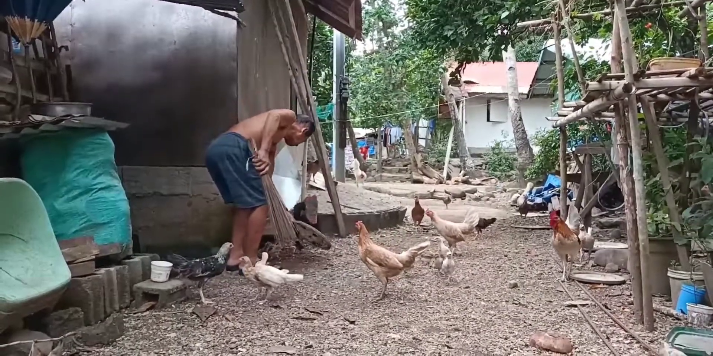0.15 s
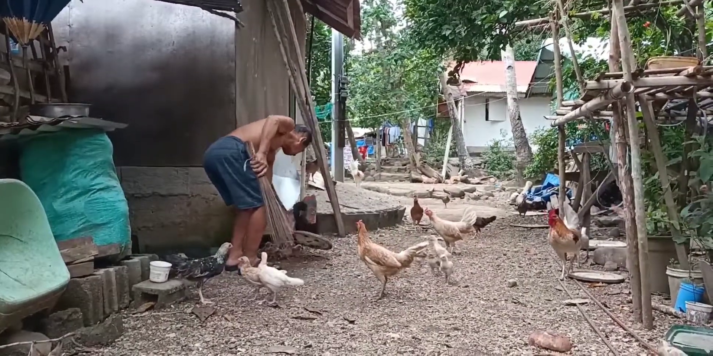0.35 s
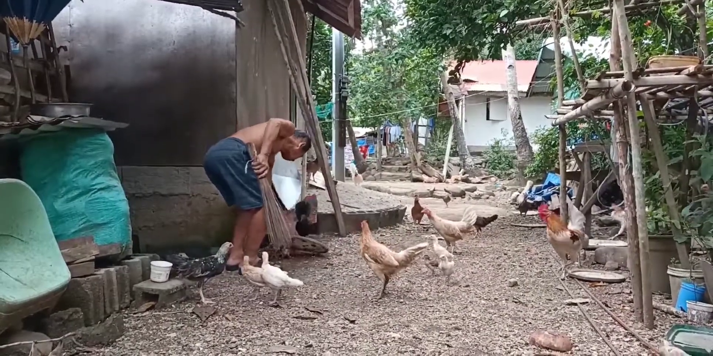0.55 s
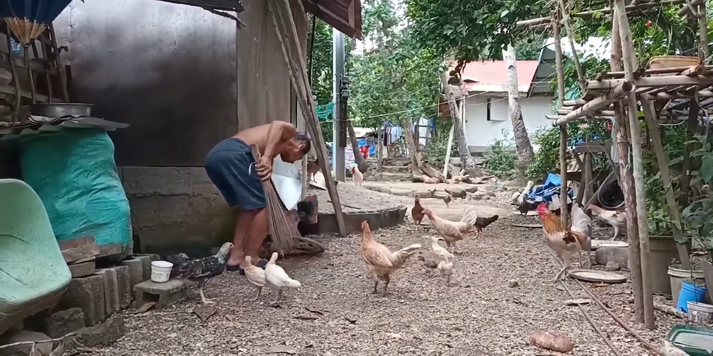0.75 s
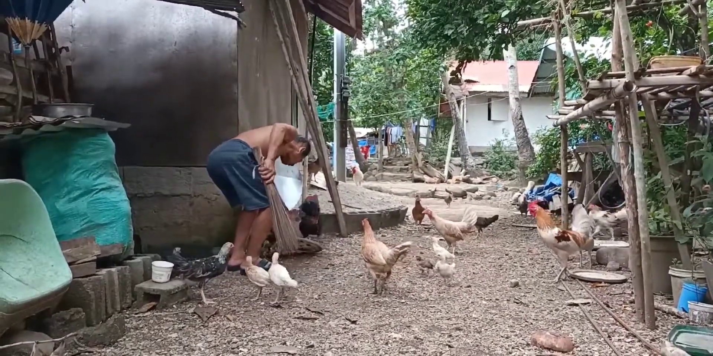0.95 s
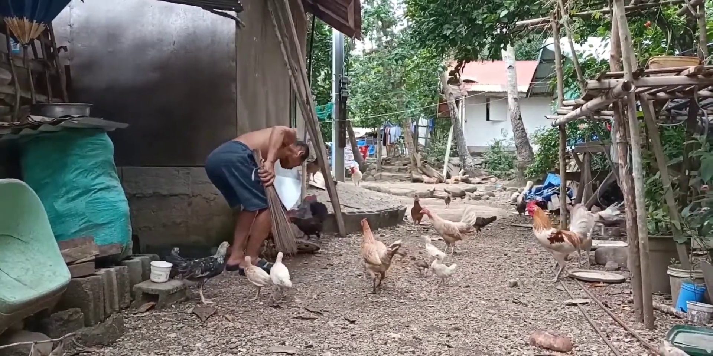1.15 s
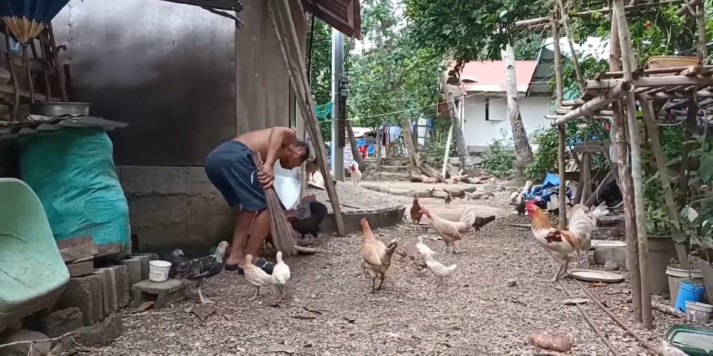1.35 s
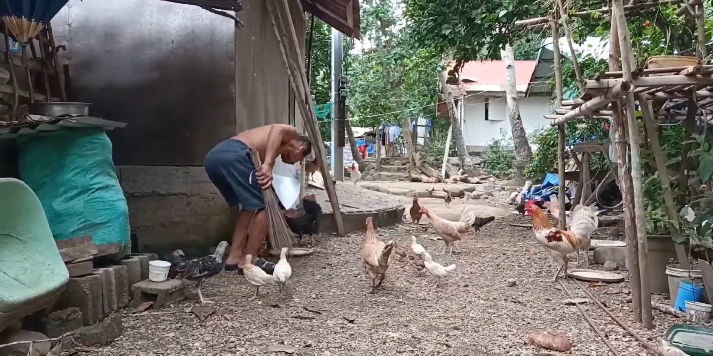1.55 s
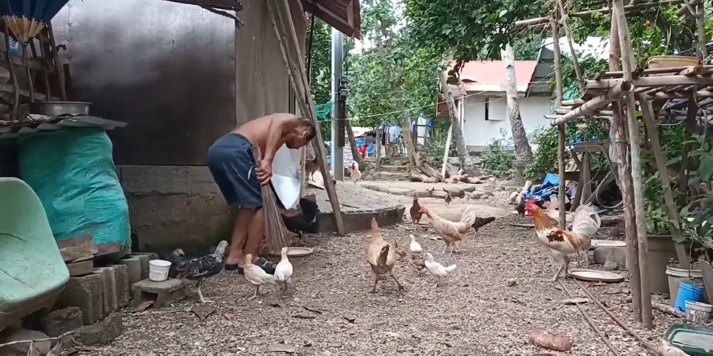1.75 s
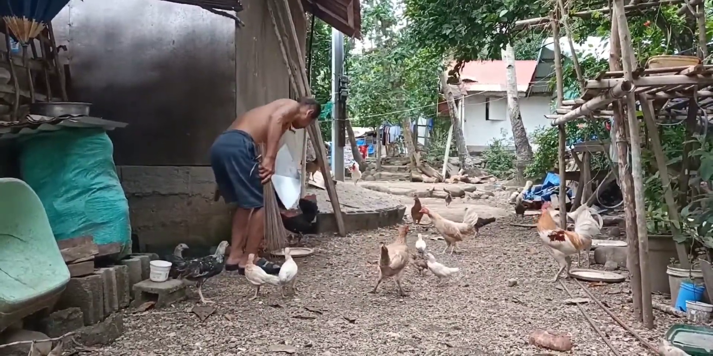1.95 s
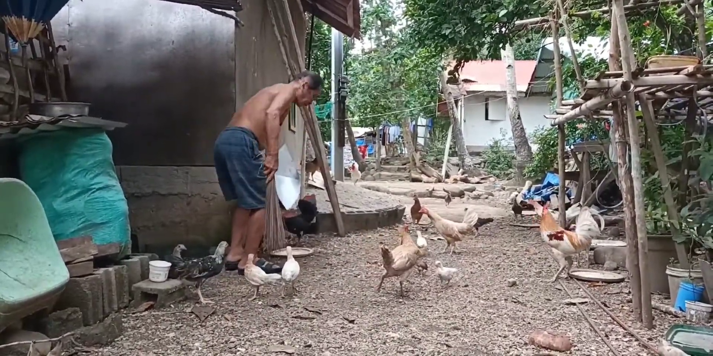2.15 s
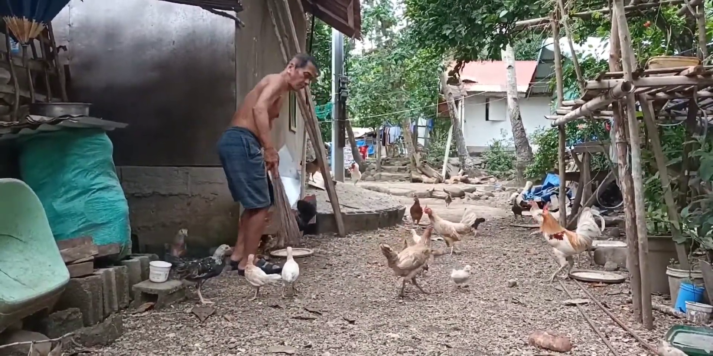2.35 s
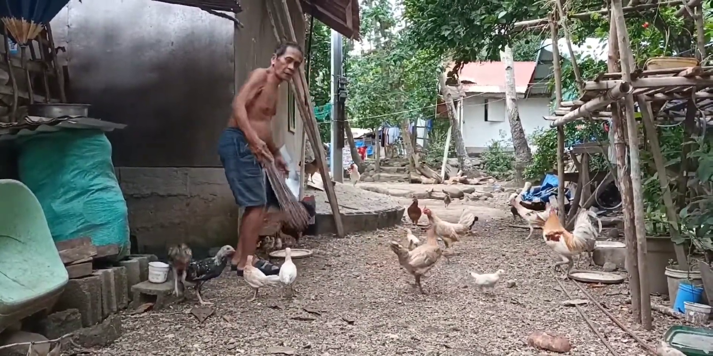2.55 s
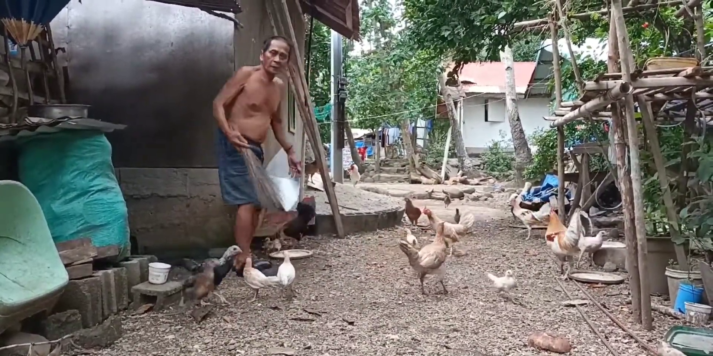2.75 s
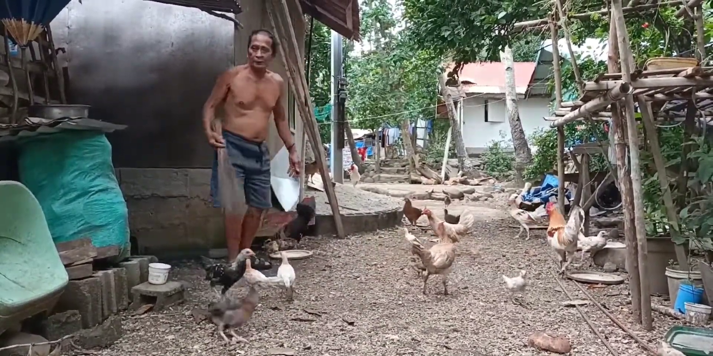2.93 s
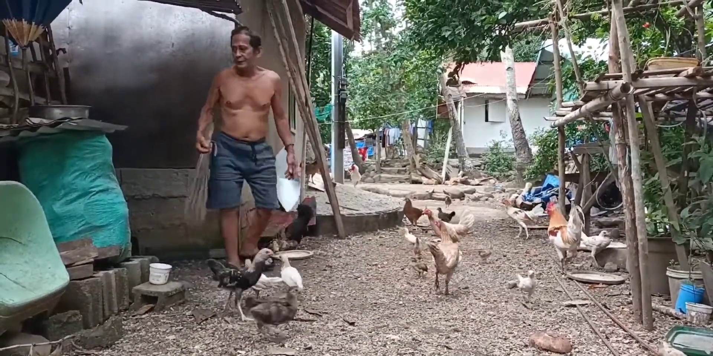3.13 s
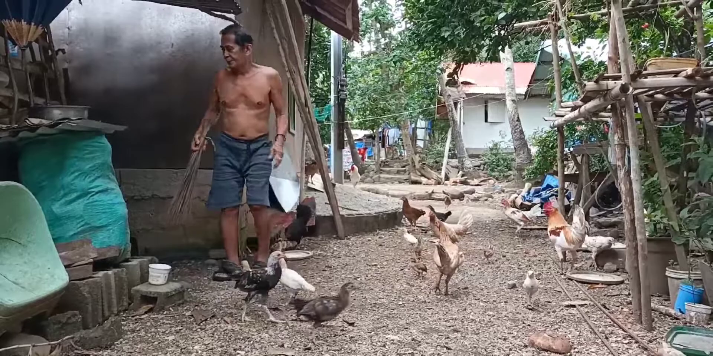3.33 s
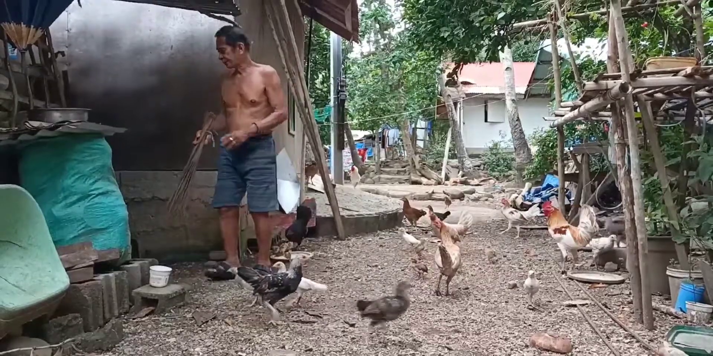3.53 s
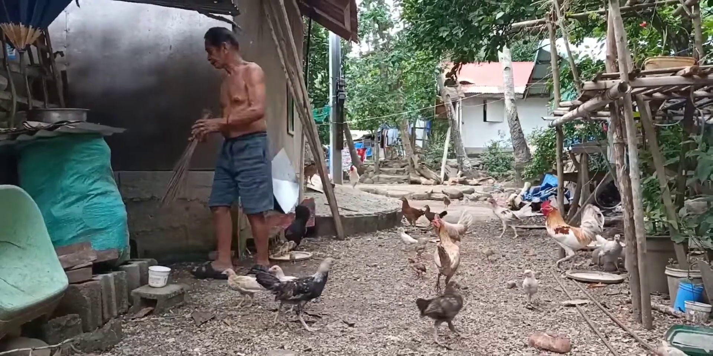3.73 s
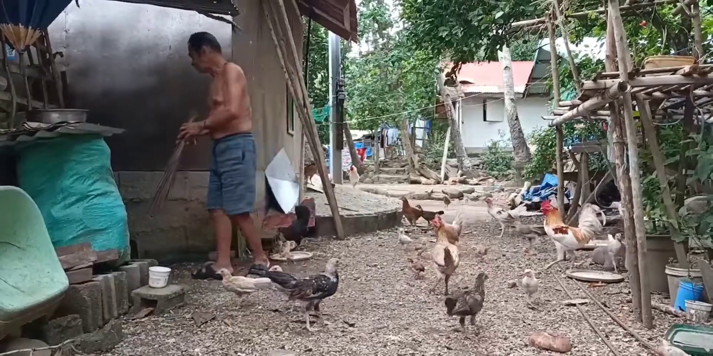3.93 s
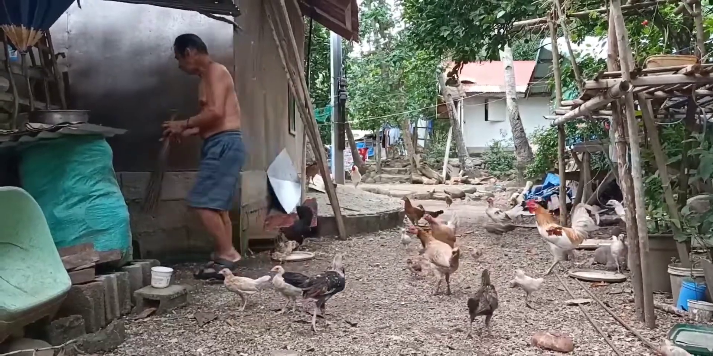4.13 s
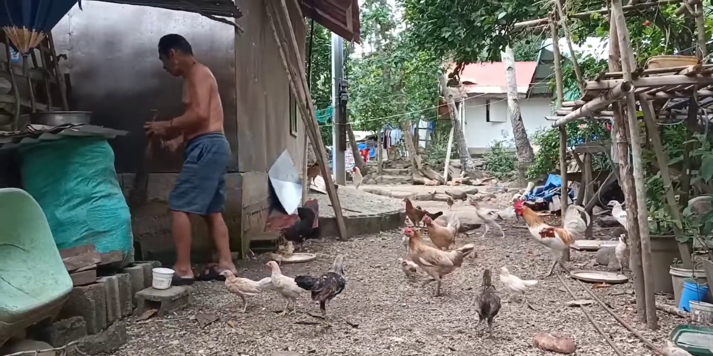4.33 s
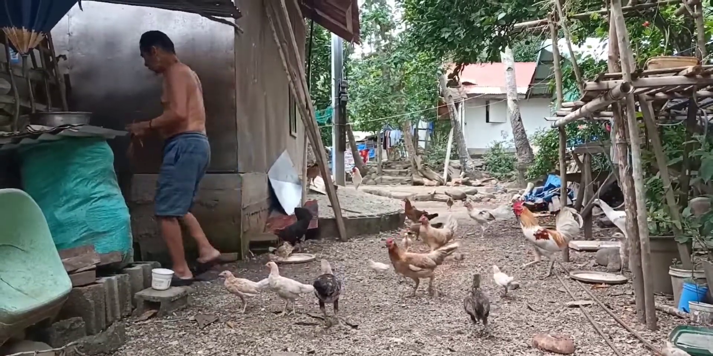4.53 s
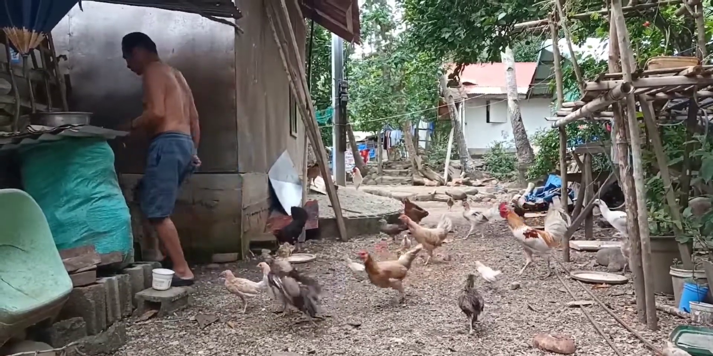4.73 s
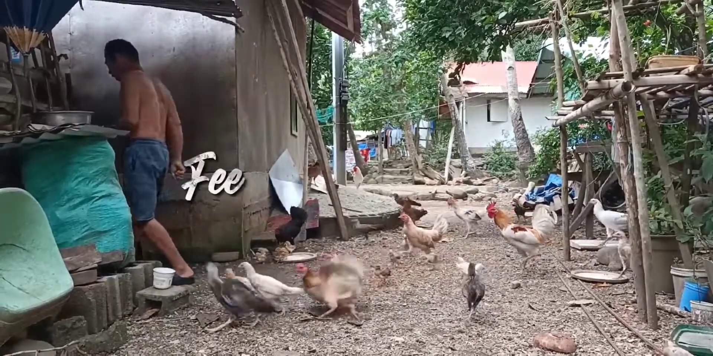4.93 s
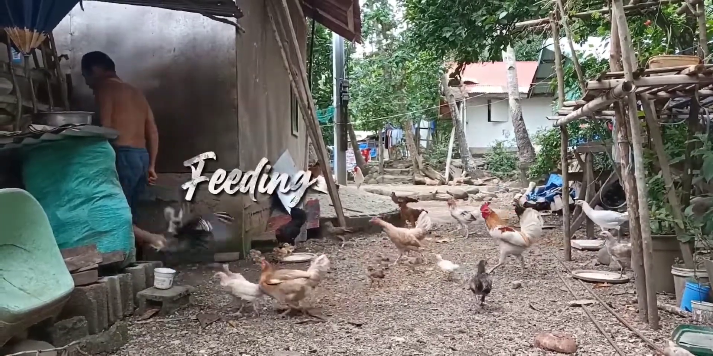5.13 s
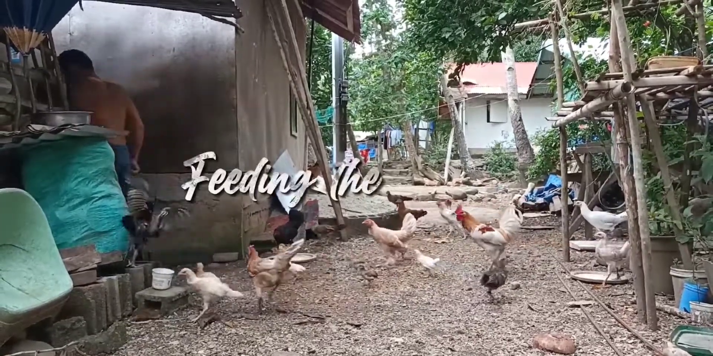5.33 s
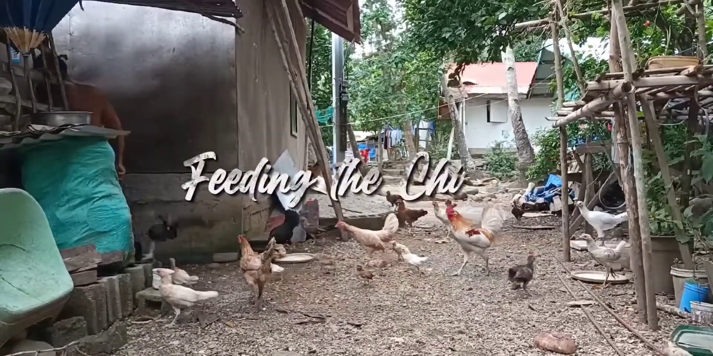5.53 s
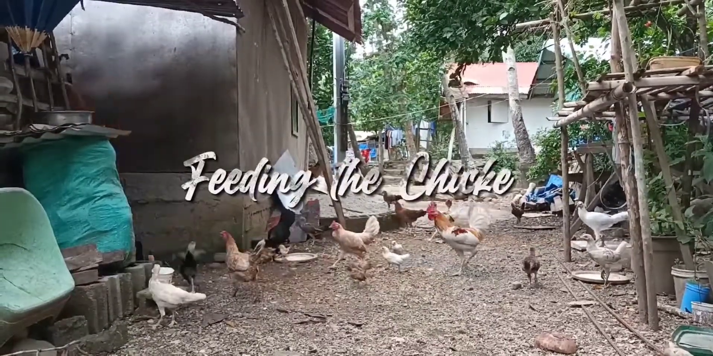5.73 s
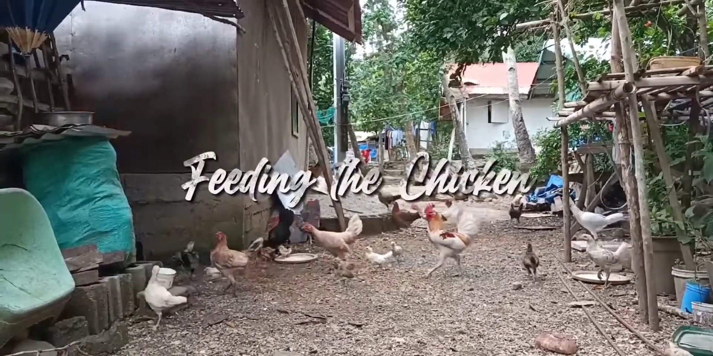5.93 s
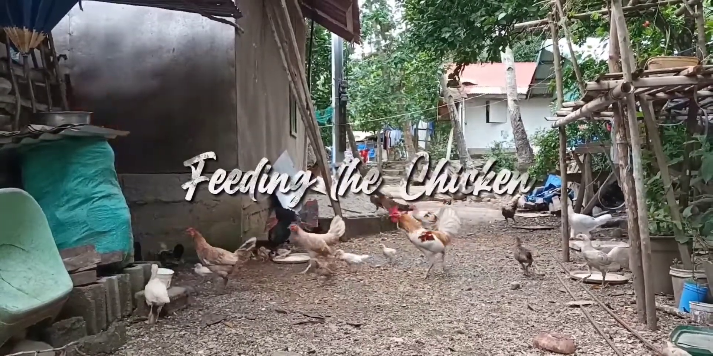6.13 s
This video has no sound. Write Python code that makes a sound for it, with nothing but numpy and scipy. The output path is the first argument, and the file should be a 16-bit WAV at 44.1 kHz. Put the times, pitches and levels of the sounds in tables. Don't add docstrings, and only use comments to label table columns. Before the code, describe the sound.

An outdoor poultry yard heard in stereo: bright chick cheeps scattered all around, short low clucks from several hens, faint high insect notes and a steady distant motor hum. A few soft coos come midway. After about four and a half seconds, loud irregular wing flaps burst out close by, popping and snapping through the continuing peeps, then stop, leaving clucks and cheeps with a short wall echo.

```python
import sys
import numpy as np
from scipy import signal
from scipy.io import wavfile
from scipy.ndimage import uniform_filter1d

SR = 44100
rng = np.random.default_rng(int(sys.argv[2]) if len(sys.argv) > 2 else 0)


def to_wav(sig):
    pcm = np.clip(np.atleast_2d(sig), -1, 1) * 32767
    pcm = np.round(pcm).astype(np.int16)
    wavfile.write(sys.argv[1], SR, pcm.T)


def level_to_linear(level):
    exponent = np.asarray(level, float) / 20
    return 10 ** exponent


N = 272538

# left minus right in dB, lag of the left in samples.
PLACES = [
    (4, 3),
    (-1.5, -2),
    (-11, -7),
    (10, 6.5),
]
# delay in seconds, level in dB.
WALLS = [(.016, -9), (.031, -9), (.052, -11)]
# frequency in Hz, time to fall 60 dB in seconds.
YARD_DECAY = [(300, 0.015), (1500, 0.2), (4000, 0.39), (10000, 0.17)]

# frequency in Hz, level in dB per Hz.
AIR_COLOUR = [(15, -42), (30, -28), (50, -8), (113, -3), (140, -10), (216, -17), (500, -23), (1820, -30),
              (2440, -25), (2900, -22), (5060, -29), (7600, -24), (8000, -46), (14500, -42), (15700, -53)]
# frequency in Hz, likeness from 0 to 1.
LIKENESS = [(60, 1), (380, 0.57), (2380, 0.053), (15000, 0.5)]
AIR_DB, PATCHY_DB = -56, 2.8
# frequency in Hz, waver width in Hz, level in dB.
HUM_LINES = [(64.6, 18, -66.5), (93.8, 3.8, -58), (117.2, 0.98, -52.5), (140.7, 6.1, -61)]
# time in seconds, level in dB.
HUM_LOAD = [(0.0, -50), (6.18, -47)]
HUM_WAVER = .25

# start in seconds, length in seconds, start pitch in Hz, end pitch in Hz, level in dB.
HELD_LEFT = [(0.143, 0.05, 4450, 3750, -43), (0.34, 0.105, 5050, 4400, -44), (2.25, 0.035, 5650, 4360, -48),
             (2.898, 0.074, 4600, 4050, -51), (3.487, 0.026, 3450, 2900, -38)]
HELD_RIGHT = [(0.083, 0.017, 3240, 2870, -43.5), (0.604, 0.029, 3340, 2940, -40.5),
              (1.422, 0.092, 4220, 3450, -43.5), (2.072, 0.065, 4080, 3250, -45),
              (3.515, 0.055, 4500, 3200, -43), (3.545, 0.09, 4050, 2950, -38),
              (3.802, 0.061, 4190, 3860, -49), (3.982, 0.046, 3540, 2550, -50),
              (4.578, 0.15, 4170, 3950, -41), (5.04, 0.053, 3550, 3060, -41.5),
              (5.428, 0.024, 4870, 2700, -53), (5.509, 0.034, 3650, 2940, -37.5),
              (5.863, 0.12, 4280, 3690, -50.5)]
# start and length in seconds, two pitches in Hz, dB.
SLIDES_LEFT = [(0.762, 0.025, 4300, 3300, -51), (2.915, 0.07, 6400, 4300, -52),
               (2.511, 0.094, 6600, 4800, -54), (3.421, 0.12, 5950, 5070, -58.5),
               (4.15, 0.07, 5800, 5240, -53.5), (4.391, 0.13, 3690, 3096, -49),
               (4.434, 0.042, 3100, 2190, -49.5)]
SLIDES_AHEAD = [(0.001, 0.077, 4480, 3504, -46), (0.39, 0.088, 4400, 3170, -38),
                (0.323, 0.028, 4200, 2450, -51), (1.03, 0.052, 4040, 3700, -56),
                (1.859, 0.032, 4700, 2700, -54), (1.893, 0.046, 3850, 3640, -48),
                (2.16, 0.028, 4300, 3850, -42), (2.284, 0.047, 4440, 3633, -38.5),
                (2.331, 0.024, 3900, 2890, -46), (2.699, 0.032, 3800, 3080, -39.5),
                (2.981, 0.05, 4300, 3260, -43.5), (3.019, 0.034, 3340, 2610, -42.5),
                (3.19, 0.048, 3744, 3083, -44.5), (3.298, 0.042, 3610, 2280, -52),
                (3.873, 0.045, 3460, 2535, -43), (4.632, 0.035, 3550, 3050, -43),
                (5.405, 0.045, 3640, 3000, -46), (5.582, 0.06, 4020, 3500, -37),
                (5.773, 0.078, 5390, 4160, -47.5), (6.091, 0.045, 5780, 4310, -48),
                (6.153, 0.021, 4350, 3950, -45)]
SLIDES_RIGHT = [(0.544, 0.056, 4290, 3185, -43.5), (1.515, 0.048, 3900, 3420, -46),
                (2.0, 0.065, 5600, 4300, -55), (1.7, 0.039, 3535, 3060, -44.5),
                (2.535, 0.093, 4290, 3840, -52), (2.603, 0.058, 4800, 3200, -43),
                (2.657, 0.027, 3000, 2290, -45.5), (2.86, 0.034, 3870, 3436, -36),
                (4.258, 0.082, 4314, 3197, -43), (4.045, 0.11, 4335, 3400, -42.5),
                (4.21, 0.05, 2800, 2240, -53), (5.154, 0.089, 4570, 3175, -39.5),
                (5.564, 0.1, 4520, 4160, -49)]
# start and length in seconds, two pitches in Hz, dB.
HOOKS = [(0.7, 0.03, 4300, 2900, -45), (1.196, 0.05, 4400, 2950, -44), (1.36, 0.03, 4300, 2950, -51),
         (2.155, 0.049, 4000, 2850, -40.5), (2.61, 0.04, 4200, 2600, -53), (2.65, 0.04, 4500, 3500, -50),
         (2.72, 0.04, 4100, 3700, -47), (3.11, 0.05, 3700, 2900, -50), (3.2, 0.059, 4000, 2950, -43),
         (3.49, 0.04, 4000, 2700, -48), (3.63, 0.05, 4500, 3700, -49), (3.665, 0.06, 4000, 2900, -42),
         (5.822, 0.07, 4300, 2880, -41), (5.955, 0.042, 4300, 2900, -43)]
# start and length in seconds, start and end pitch in Hz, level in dB.
FAINT = [(0.02, 0.045, 8800, 7340, -56), (0.149, 0.038, 3900, 2540, -58), (2.33, 0.023, 4300, 3420, -50),
         (2.4, 0.05, 4200, 3470, -51.5), (4.975, 0.065, 4700, 4000, -50), (0.266, 0.072, 4360, 4130, -60),
         (0.375, 0.027, 4070, 3270, -54), (0.41, 0.025, 3840, 2800, -51), (0.455, 0.095, 4550, 4300, -55),
         (0.61, 0.089, 6680, 6450, -53), (0.85, 0.03, 4000, 3490, -57), (0.875, 0.033, 3230, 2590, -53),
         (0.945, 0.028, 3950, 3400, -55), (0.968, 0.03, 3200, 2730, -57), (1.075, 0.061, 4800, 4650, -60),
         (1.09, 0.045, 3800, 3900, -54), (1.985, 0.025, 3130, 2460, -64), (2.091, 0.062, 3000, 2380, -58),
         (2.62, 0.04, 3000, 2200, -57.5), (2.67, 0.08, 4870, 4420, -54), (2.94, 0.044, 3700, 3070, -47.5),
         (3.1, 0.091, 4340, 4040, -49), (3.369, 0.056, 3320, 2770, -55), (3.501, 0.068, 4610, 3860, -46),
         (3.545, 0.023, 3480, 3130, -43), (3.601, 0.078, 4850, 4110, -48.5), (3.645, 0.18, 5300, 4570, -58),
         (3.905, 0.1, 6450, 6530, -51), (4.179, 0.044, 4450, 3610, -44), (4.47, 0.11, 6750, 5830, -54),
         (4.49, 0.055, 3405, 2600, -49), (4.53, 0.063, 4970, 4300, -56), (5.409, 0.052, 4200, 2026, -47.5),
         (5.471, 0.085, 4680, 3700, -55.5), (5.915, 0.051, 8460, 6400, -55.5),
         (5.84, 0.02, 7060, 6250, -48),
         (0.305, 0.05, 6250, 6100, -52), (0.36, 0.06, 6700, 6300, -53), (0.43, 0.065, 7400, 5400, -50),
        (0.51, 0.09, 6100, 6050, -56), (0.47, 0.08, 4650, 4400, -55), (4.03, 0.12, 4900, 4800, -56),
        (4.18, 0.13, 4800, 5200, -55), (4.075, 0.07, 8200, 7000, -54), (0.465, 0.05, 3250, 2800, -45),
        (0.97, 0.03, 7000, 5500, -57), (2.638, 0.025, 7300, 6700, -53), (2.75, 0.02, 7200, 6800, -54),
        (3.82, 0.05, 4000, 2650, -53), (3.74, 0.07, 4600, 4500, -54), (3.455, 0.04, 4300, 3900, -51),
        (2.66, 0.035, 4400, 3600, -51), (3.845, 0.02, 7400, 6700, -52), (1.635, 0.03, 4300, 3200, -56)]
# start in seconds, start pitch in Hz, level in dB.
CHEEPS = [(0.098, 6650, -53), (0.426, 7030, -52), (0.619, 6400, -48), (0.84, 6480, -60),
          (1.42, 6170, -57.5), (1.605, 6650, -54.5), (1.81, 6430, -56), (2.879, 6520, -47.5),
          (3.499, 6900, -45), (3.871, 6840, -52), (4.098, 7600, -58), (4.399, 7260, -46.5),
          (4.462, 6800, -50.5), (4.744, 6360, -53), (5.646, 7600, -67), (6.002, 6730, -46)]
CHEEP_S, CHEEP_FALL = 0.061, 0.0875
# start in seconds, length in seconds, start pitch in Hz, level in dB, swell into the plunge in dB.
LONG_CALLS = [(0.651, 0.069, 5120, -61, 23), (1.161, 0.16, 5370, -52.5, 18),
              (1.598, 0.12, 5120, -60.5, 19.5), (2.048, 0.14, 5230, -50.5, 8),
              (2.746, 0.16, 5510, -52, 15.5), (3.06, 0.19, 4940, -54, -3), (3.418, 0.22, 4920, -55, 19),
              (3.757, 0.15, 5575, -49.5, 16), (4.345, 0.16, 5300, -47, 9)]
SAG, PLUNGE = .13, .29
KNEE, KNEE_WIDTH = .74, 0.0923
HELD_BEND, SLIDE_BEND, HOOK_BEND = 1.6, 0.94, .5
OVERTONES_DB = [-26, -37]
SHRILL_HZ, SHRILL_WIDTH_HZ, SHRILL_DB = 5050, 450, 13
KNOT_HZ, KNOT_WIDTH_HZ, KNOT_DB = 3460, 69, 5
GRAIN, WOBBLE = .7, .006
HIGH_SHARE, HIGH_HZ, HIGH_DB = .35, 2300, -14
NEAR_DB, ECHO_DB = 5.5, -3.5
CROWD_DB, CROWD_ECHO_DB = 4.0, -5.0

CRICKET_STARTS = [0.511, 1.28, 2.04, 2.796, 3.56, 4.32, 5.09, 5.965]
CRICKET_HZ, CRICKET_LENGTH_S, CRICKET_DB = 7710, 0.02, -46.5

# time in seconds, peak in dB, hollow ring in Hz, feather snap in relative dB.
CLAPS = [(4.723, -17.5, 2070, 3), (4.7315, -12.5, 2240, -14), (4.7513, -19, 2030, -8),
         (4.8109, -21, 2100, -20), (4.816, -20, 1920, -0.5), (4.8772, -19.5, 2270, -8),
         (4.883, -26, 2130, 6.5), (4.8897, -18, 1950, -11), (4.911, -27, 1920, -19),
         (4.9248, -25, 1680, -5), (4.9626, -16, 1980, -7), (4.9704, -12, 2120, -6.5),
         (4.992, -18.5, 2550, -6), (5.041, -30, 2400, -9), (5.0562, -17.5, 2200, -12),
         (5.1056, -29, 2290, 2), (5.1168, -13.5, 2190, -18), (5.2015, -26.5, 2240, 5),
         (5.2051, -17.5, 2230, -0.5), (5.227, -20.5, 2460, 4), (5.238, -14, 2140, -6.5),
         (5.252, -45, 2300, -3), (5.264, -38.5, 2300, 10), (5.3171, -27, 2010, 0), (5.321, -18, 1920, -5),
         (5.36, -29, 2060, -5), (5.368, -31, 2400, -8), (5.387, -22, 1440, -26), (5.467, -25.5, 2050, -6),
         (5.6255, -18.5, 1740, 2), (5.631, -12.5, 1570, -17), (5.714, -23.5, 2100, 3),
         (5.719, -22.5, 2150, -1), (5.751, -20, 1960, 3), (5.7544, -12, 2150, -4.5)]
# time in seconds, peak in dB, ring in Hz, snap in relative dB.
PECKS = [
    (0.247, -58, 2340, 2.3),
    (3.455, -42, 2300, -12),
    (3.464, -44, 1500, -12),
    (6.152, -40, 2240, 8),
]
LEAD_S, LEAD_POP = .014, .3
SNAP_SPREAD = .55

# frequency in Hz, width in Hz, level in dB.
FAR_THROATS = [
    [(800, 150, -8), (1230, 140, 0), (1980, 110, 3)],
    [(1425, 110, 0), (1750, 150, -2), (2010, 130, -3)],
    [(1866, 60, -7), (2130, 150, 1.5)],
]
# time in seconds, level in dB.
FAR_CALLS = [
    [(0.5, -62.5), (0.66, -47), (0.8, -81)],
    [(1.26, -58), (1.33, -53), (1.36, -61), (1.39, -51), (1.42, -63), (1.455, -61), (1.478, -47),
     (1.52, -58), (1.58, -68)],
    [(1.64, -50.5), (1.736, -60), (1.8, -78)],
]
# start in seconds, peak in dB, length in seconds.
DEEP_HEN = [(0.694, -45.5, 0.019), (1.101, -44.5, 0.041), (2.166, -39.5, 0.032), (2.21, -36.5, 0.026),
            (2.969, -37, 0.028), (3.021, -37, 0.018), (3.18, -50.5, 0.045), (4.064, -40.5, 0.036),
            (4.238, -44.5, 0.012), (4.535, -40, 0.03), (4.578, -39, 0.025), (5.016, -37.5, 0.01),
            (5.202, -30, 0.01), (5.712, -29, 0.016), (5.92, -46, 0.023), (6.055, -38.5, 0.015),
            (6.099, -41, 0.016)]
MIDDLE_HEN = [(0.649, -44, 0.022), (2.406, -45.5, 0.033), (2.449, -40.5, 0.013), (2.5, -54, 0.03),
              (2.57, -55.5, 0.016), (2.692, -49, 0.021), (4.278, -39, 0.016), (4.372, -42, 0.013),
              (4.496, -48, 0.035), (4.67, -47.5, 0.097), (4.88, -29, 0.027), (5.47, -33.5, 0.018),
              (5.588, -38, 0.011), (5.666, -39.5, 0.022), (5.805, -36, 0.019), (5.999, -41.5, 0.045)]
BRIGHT_HEN = [(0.517, -46, 0.017), (0.845, -37.5, 0.045), (1.423, -38.5, 0.037), (1.628, -44, 0.023),
              (1.641, -39.5, 0.024), (1.662, -42, 0.023), (1.703, -43.5, 0.012), (1.722, -48, 0.012),
              (1.741, -42, 0.0094), (1.757, -43, 0.015), (4.112, -39, 0.027), (5.514, -36.5, 0.037),
              (5.848, -37, 0.021), (6.138, -41, 0.037)]
HEN_HZ = [555, 820, 1110]
# frequency in Hz, width in Hz, level in dB.
THROAT = [(545, 51, 9.5), (899, 172, 19), (1096, 44, 10)]
# start and length in seconds, start and end pitch
# in Hz, level in dB.
MURMURS = [(2.508, 0.025, 930, 850, -58), (2.685, 0.03, 960, 820, -54), (4.49, 0.04, 1000, 800, -52),
           (4.67, 0.04, 720, 800, -55)]
# start in seconds, length in seconds, pitch in Hz, level in dB.
COOS = [
    (3.08, 0.1, 338, -61.5),
    (3.251, 0.11, 376, -58.5),
    (3.403, 0.078, 376, -51),
    (3.551, 0.049, 377, -51),
]
COO_PARTIALS_DB = [6, 0.5, 6.5, -4]

# time in seconds, level in dB.
RUSTLE = [
    [(2.9, -102), (3.0, -68.5), (3.1, -83), (3.18, -76.5), (3.24, -85), (3.28, -93)],
    [(4.72, -65), (4.78, -73.5), (4.86, -94), (4.95, -72), (5.02, -66), (5.07, -58), (5.13, -68.5),
     (5.26, -76), (5.3, -83)],
    [(5.3, -76), (5.38, -73), (5.5, -72.5), (5.6, -88), (5.65, -71), (5.7, -72.5), (5.77, -64), (5.8, -87)],
    [(6.1, -74.5), (6.18, -71)],
]
# frequency in Hz, level in dB per Hz.
RUSTLE_COLOUR = [(180, -31), (300, -16), (1570, -15.5), (2050, -10), (5260, -9), (7500, -10.5),
                 (8300, -22.5), (12000, -26.5), (14500, -25), (15700, -24)]
RUSTLE_GRAIN_DB = 2.0


def evened(x):
    return x / np.sqrt(np.mean(x ** 2) + 1e-20)


def read(points, hz):
    f, value = np.transpose(points)
    return np.interp(np.log(hz + 1), np.log(f + 1), value)


def add(mix, s, sound):
    part = mix[max(round(s * SR), 0):][:len(sound)]
    part += sound[:len(part)]


def resonate(x, hz, width):
    b, a = signal.iirpeak(hz, hz / (1.71 * width), SR)
    return signal.lfilter(b, a, signal.lfilter(b, a, x))


def placed(x, pan_db, lag):
    return np.array([np.roll(x, round(lag)), x]) * level_to_linear([[pan_db / 2], [-pan_db / 2]])


def yard(x):
    taps = np.zeros((2, SR // 2))
    slots = np.arange(700, SR // 2 - 20, 20)
    at = slots + rng.integers(0, 20, (2, len(slots)))
    np.put_along_axis(taps, at, rng.choice([-1., 1.], at.shape), axis=1)
    hz, t, z = signal.stft(taps, SR, nperseg=256)
    decay = level_to_linear(-60 * t / read(YARD_DECAY, hz)[:, None])
    tail = signal.istft(z * decay, SR, nperseg=256)[1]
    tail /= np.linalg.norm(tail[0])
    for delay, db in WALLS:
        arrivals = np.round(delay * SR * rng.uniform(.8, 1.2, 2)).astype(int)
        tail[[0, 1], arrivals] += level_to_linear(db)
    return signal.fftconvolve(x[None], tail, axes=1)[:, :N]


def diffuse_noise(colour):
    hz = np.fft.rfftfreq(1024, 1 / SR)
    a, b, c, d, patches = rng.standard_normal((5, 513, N // 256 + 5))
    patches = uniform_filter1d(patches, size=12, axis=0)
    patches = evened(uniform_filter1d(patches, size=10, axis=1))
    same = np.clip(read(LIKENESS, hz), -1, 1)[:, None]
    left = a + 1j * b
    right = same * left + np.sqrt(1 - same ** 2) * (c + 1j * d)
    gain = level_to_linear(read(colour, hz))
    z = np.array([left, right]) * gain[:, None] * level_to_linear(PATCHY_DB * patches)
    sound = evened(signal.istft(z, nperseg=1024, noverlap=768)[1][:, :N])
    return sound * np.linalg.norm(gain) / np.linalg.norm(gain[5:])


def open_air():
    return level_to_linear(AIR_DB) * diffuse_noise(AIR_COLOUR)


def hum():
    t = np.arange(N) / SR
    lines = np.zeros(N)
    for hz, width, db in HUM_LINES:
        waver = evened(resonate(rng.standard_normal(N), hz, width))
        lines += level_to_linear(db) * evened(np.sin(2 * np.pi * hz * t) + HUM_WAVER * waver)
    s, db = np.transpose(HUM_LOAD)
    return placed(lines * level_to_linear(np.interp(t, s, db) - db.mean()), -1.5, -9)


def peep(length, start_hz, end_hz, bend, db, plunge=0, swell_db=0, overtone_db=0):
    u = np.linspace(0, 1, round(length * SR))
    rates, phases = rng.random((2, 2, 4, 1))
    flutter = np.sin(2 * np.pi * ((30 + 200 * rates) * u * length + phases))
    grain, wobble = flutter.sum(axis=1) / 2
    knee = (1 + np.tanh((u - KNEE) / KNEE_WIDTH)) / 2
    hz = start_hz + (end_hz - start_hz) * u ** bend - plunge * start_hz * knee
    hz = hz * (1 + WOBBLE * wobble)
    turns = 2 * np.pi * np.cumsum(hz) / SR
    shrill_db = overtone_db + SHRILL_DB * np.exp(-((hz - SHRILL_HZ) / SHRILL_WIDTH_HZ) ** 2)
    tone = np.sin(turns)
    for k, partial_db in enumerate(OVERTONES_DB, 2):
        tone += level_to_linear(partial_db + shrill_db) * np.sin(k * turns) * (k * hz < SR / 2)
    knot_db = KNOT_DB * np.exp(-((hz - KNOT_HZ) / KNOT_WIDTH_HZ) ** 2)
    level = level_to_linear(db + swell_db * knee + knot_db)
    return level * tone * (1 + GRAIN * grain) * np.sin(np.pi * u ** 1.05) ** .5


def chicks(held, slides, hooks=()):
    out = np.zeros(N)
    for table, bend in [(held, HELD_BEND), (slides, SLIDE_BEND), (hooks, HOOK_BEND)]:
        for s, length, start_hz, end_hz, db in table:
            add(out, s, peep(length, start_hz, end_hz, bend, db))
    return out


def far_chicks(count=300):
    out = np.zeros(N)
    for when, pitch, fall, size, small in rng.random((count, 5)):
        high = small < HIGH_SHARE
        top = 3400 + 1400 * pitch + HIGH_HZ * high
        end = top * (1 - (.14 + .2 * fall) / (1 + high))
        db = -58 + 8 * size + HIGH_DB * high
        add(out, when * N / SR, peep(.02 + .03 * size, top, end, .8 + 2.2 * size, db, overtone_db=-6))
    return out


def insects(count=50):
    out = np.zeros(N)
    for when, pitch, size in rng.random((count, 3)):
        hz = 7330 + 170 * pitch
        add(out, when * N / SR, peep(0.066 + 0.11 * size, hz, hz - 120, 0.41, -60 + 3 * size))
    for s in CRICKET_STARTS:
        add(out, s, peep(CRICKET_LENGTH_S, CRICKET_HZ, CRICKET_HZ - 30, 1, CRICKET_DB))
    return out


def wings_and_pecks():
    out = np.zeros((2, N))
    t = np.arange(-300, 1500) / SR
    after = np.maximum(t, 0)
    bright = signal.butter(1, [4500, 10000], "band", fs=SR)
    swish_shape = np.where(t < 0, 0.34 * np.exp(t / 0.0079), np.exp(-after / 0.0071))
    snap_shape = np.where(t < 0, np.exp(t / 0.00085), np.exp(-after / 0.0029))
    for s, db, hz, snap_db in CLAPS + PECKS:
        air, middle, side_air = rng.standard_normal((3, len(t)))
        leading = any(0 < s2 - s < LEAD_S and db2 > db for s2, db2, *_ in CLAPS)
        pop = (t >= 0) * np.sin(2 * np.pi * hz * after) * np.exp(-after / .0012)
        pop = pop * (LEAD_POP if leading else 1)
        hollow = 0.29 * evened(resonate(air, hz, 980)) * swish_shape
        push = 0.026 * evened(resonate(air * swish_shape, 665, 240))
        push += 0.011 * evened(resonate(air * swish_shape, 220, 165))
        feathers = middle + SNAP_SPREAD * np.array([side_air, -side_air])
        snap = level_to_linear(snap_db - 9.0) * signal.lfilter(*bright, feathers) * snap_shape
        for side, clap in zip(out, level_to_linear(db) * (pop + hollow + push + snap)):
            add(side, s + t[0], clap)
    return out


def far_call(rows, throat):
    s, db = np.transpose(rows)
    t = np.arange(s[0], s[-1], 1 / SR)
    breath, catch = rng.standard_normal((2, SR))[:, :len(t)]
    drive = breath * level_to_linear(1.6 * evened(uniform_filter1d(catch, size=1200)))
    voice = sum(level_to_linear(d) * evened(resonate(drive, f, np.clip(w, 40, 300))) for f, w, d in throat)
    return level_to_linear(np.interp(t, s, db)) * evened(voice) * signal.windows.tukey(len(t), .2)


def cluck(db, hz, length):
    size = round(length * SR)
    pitch = rng.random()
    jitter, breath = rng.standard_normal((2, 4410))[:, :size]
    rate = (175 + 40 * pitch) * (1 + 0.49 * uniform_filter1d(jitter, size=100))
    turns = 0.703 + np.cumsum(rate) / SR
    drive = np.diff(np.floor(turns), prepend=0) + 0.1 * breath
    drive = drive * np.sin(np.pi * np.linspace(.03, 1, size) ** 0.61)
    drive = np.pad(drive, (0, 1300))
    voice = resonate(drive, hz * (0.977 + .14 * pitch), 110)
    for f, width, d in THROAT:
        voice += level_to_linear(d - 15.5) * resonate(drive, f, width) * 110 / width
    return level_to_linear(db) * voice / abs(voice).max()


def coo(length, hz, db):
    u = np.linspace(0, 1, round(length * SR))
    turns = 2 * np.pi * np.cumsum(hz * (1.01 - 0.038 * u)) / SR
    tone = sum(level_to_linear(d) * np.sin(k * turns) for k, d in enumerate(COO_PARTIALS_DB, 1))
    return level_to_linear(db - 10.0) * tone * (1 + 0.31 * np.sin(9 * u + hz)) * signal.windows.tukey(len(u), .6)


def hens():
    out = np.zeros(N)
    for rows, throat in zip(FAR_CALLS, FAR_THROATS):
        add(out, rows[0][0], far_call(rows, throat))
    for table, hz in zip([DEEP_HEN, MIDDLE_HEN, BRIGHT_HEN], HEN_HZ):
        for s, db, length in table:
            add(out, s, cluck(db, hz, length))
    for s, length, start_hz, end_hz, db in MURMURS:
        add(out, s, peep(length, start_hz, end_hz, 1, db))
    for s, length, hz, db in COOS:
        add(out, s, coo(length, hz, db))
    return out


def caller():
    out = np.zeros(N)
    for s, length, hz, db, swell_db in LONG_CALLS:
        add(out, s, peep(length, hz, hz * (1 - SAG), 0.98, db, PLUNGE, swell_db, overtone_db=-2))
    return out


def rustle():
    t, level = np.arange(N) / SR, np.zeros(N)
    for rows in RUSTLE:
        s, db = np.transpose(rows)
        level += level_to_linear(np.interp(t, s, db, left=-120, right=-120))
    catches = evened(uniform_filter1d(rng.standard_normal(N), size=150))
    grain = evened(level_to_linear(RUSTLE_GRAIN_DB * catches))
    return level_to_linear(25.5) * level * grain * diffuse_noise(RUSTLE_COLOUR)


def scene():
    mix = open_air() + hum() + rustle()
    cheeps = [(s, CHEEP_S, hz, hz * (1 - CHEEP_FALL), db) for s, hz, db in CHEEPS]
    left = chicks(HELD_LEFT + cheeps, SLIDES_LEFT)
    ahead = chicks([], SLIDES_AHEAD + FAINT)
    right = chicks(HELD_RIGHT, SLIDES_RIGHT, HOOKS)
    for flock, (pan_db, lag) in zip([left, ahead, right, caller()], PLACES):
        mix += level_to_linear(NEAR_DB) * placed(flock, pan_db, lag) + level_to_linear(ECHO_DB) * yard(flock)
    crowd, trills, claps, voices = far_chicks(), insects(), wings_and_pecks(), hens()
    mix += level_to_linear(CROWD_DB) * placed(crowd, -4.0, -6.5) + level_to_linear(CROWD_ECHO_DB) * yard(crowd)
    mix += placed(trills, -3.0, 5) + level_to_linear(-2.0) * yard(trills)
    mix += claps * level_to_linear([[-.6], [.6]]) + level_to_linear(-21) * yard(claps[0])
    mix += placed(voices, -3.0, -6.0) + level_to_linear(-8) * yard(voices)
    return mix


def top_cut(x):
    return signal.sosfilt(signal.butter(12, 15850, fs=SR, output="sos"), x)


def record(dry):
    band_limit = signal.firwin(401, 15480, window=("kaiser", 9), fs=SR)
    limited = signal.oaconvolve(dry, band_limit[None], "same")
    return top_cut(limited - .0005)


dry = scene()
out = record(dry)
to_wav(out)
```